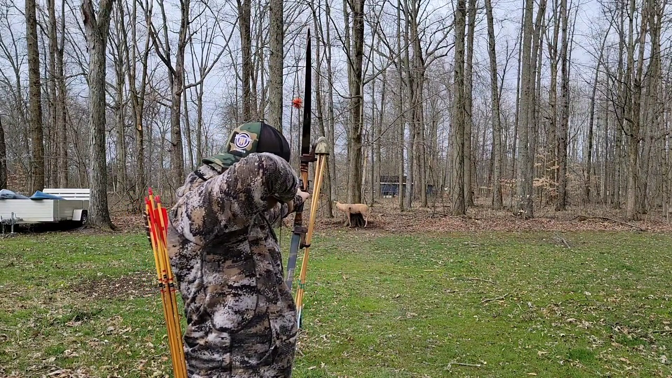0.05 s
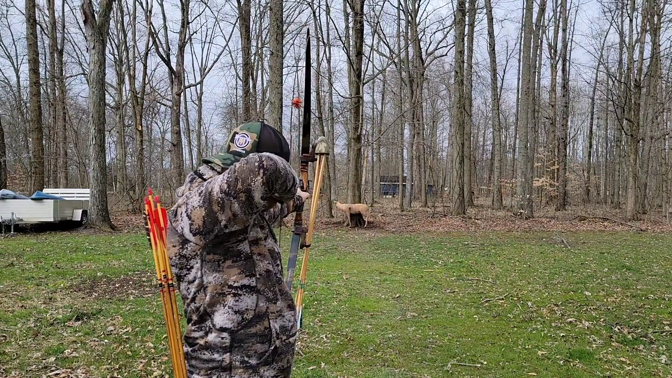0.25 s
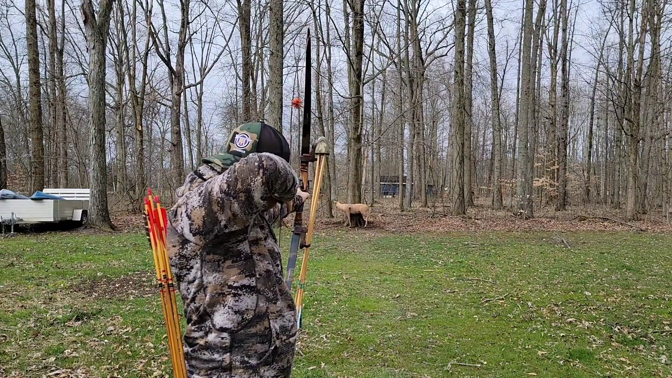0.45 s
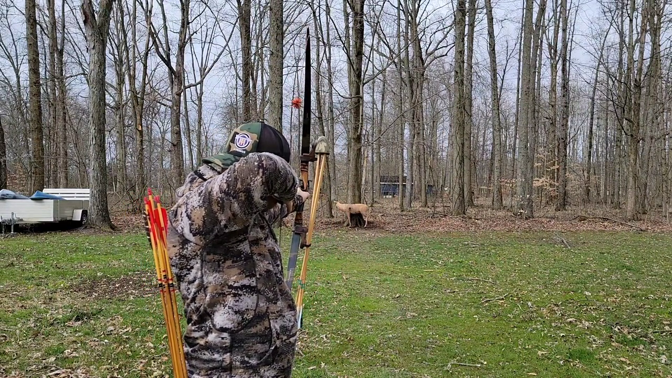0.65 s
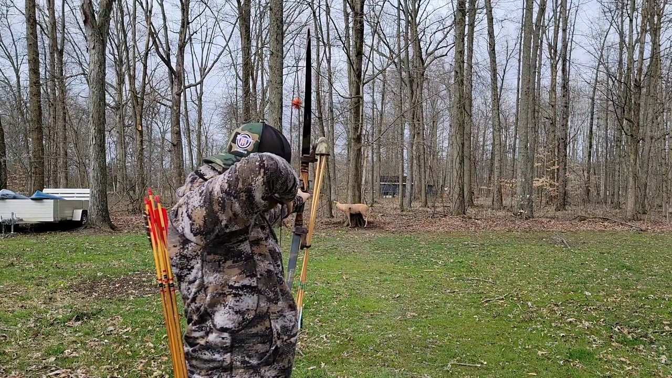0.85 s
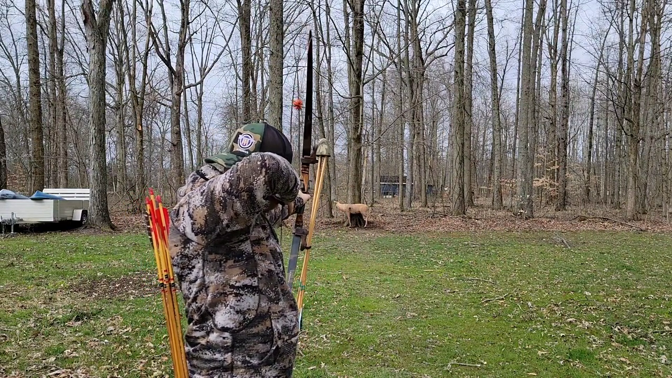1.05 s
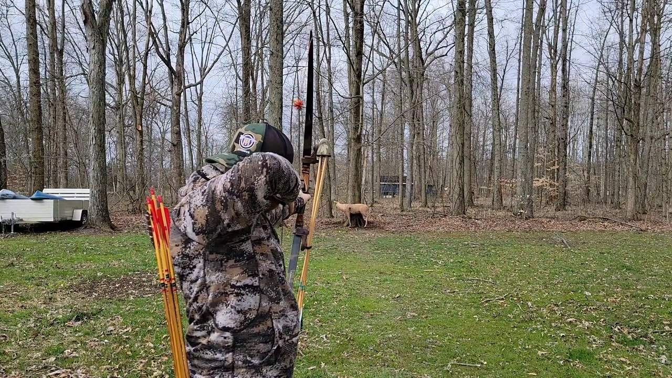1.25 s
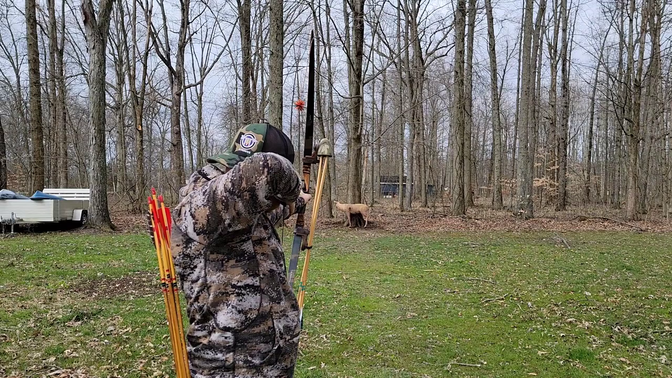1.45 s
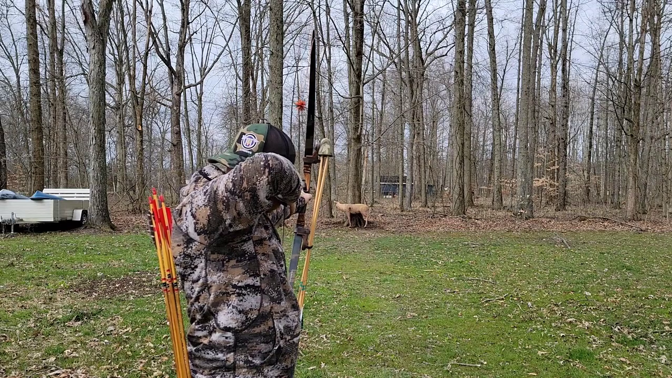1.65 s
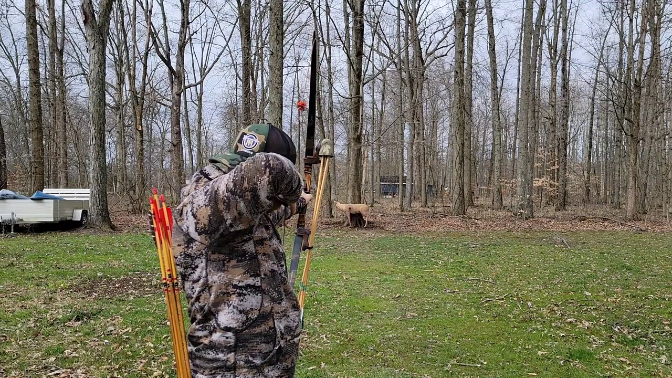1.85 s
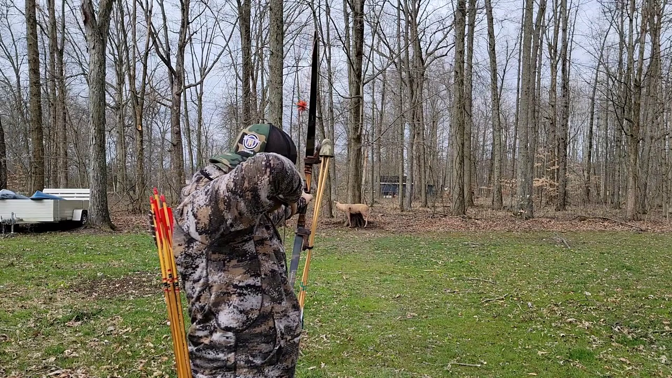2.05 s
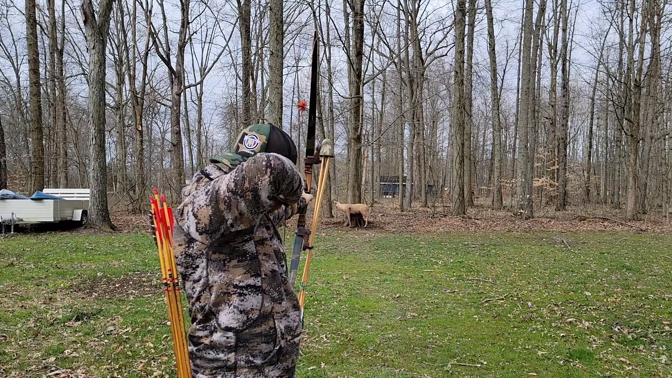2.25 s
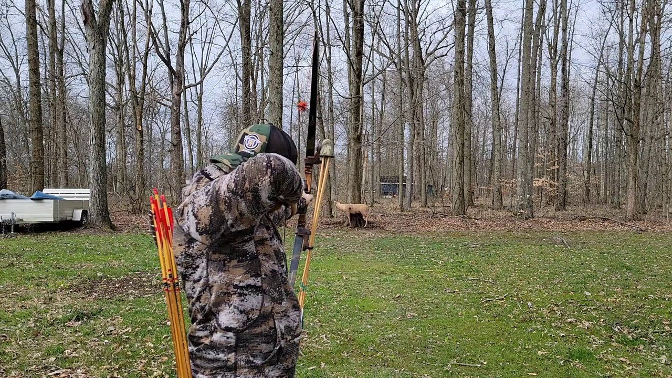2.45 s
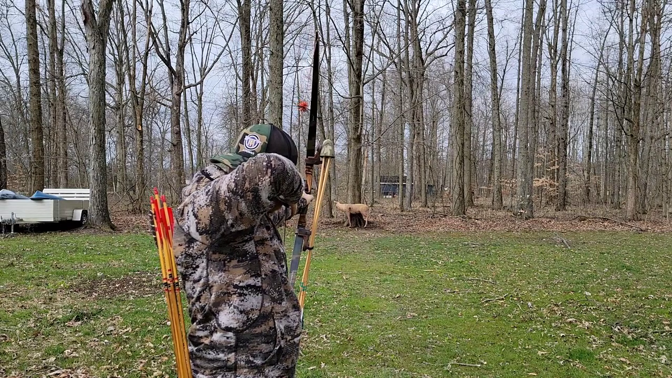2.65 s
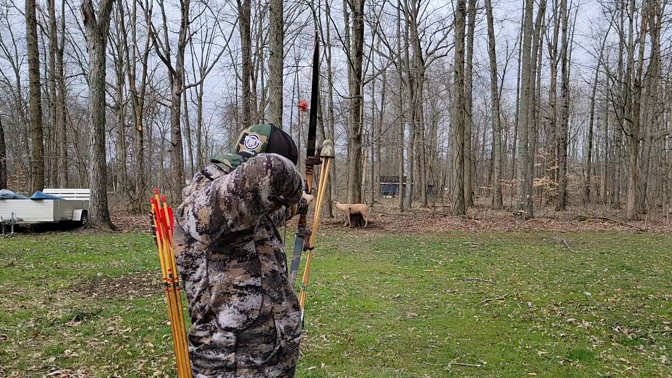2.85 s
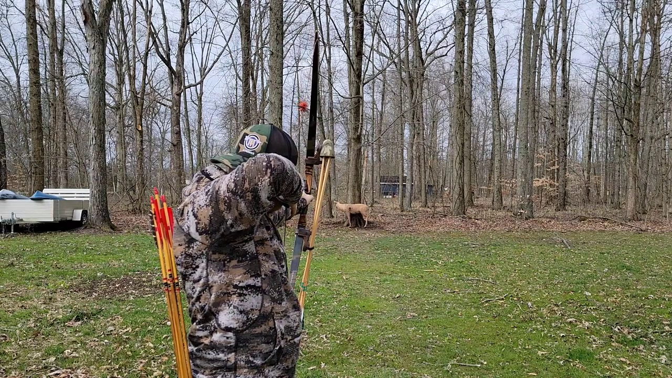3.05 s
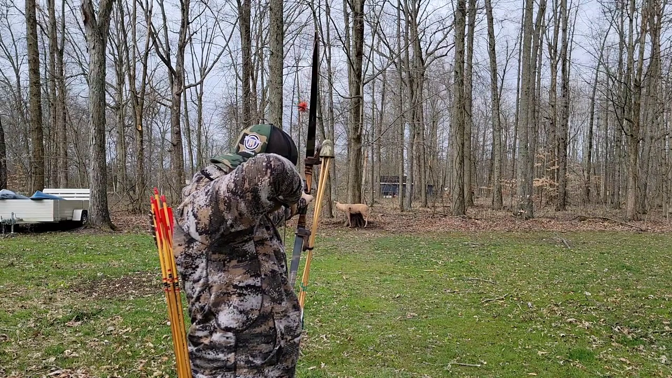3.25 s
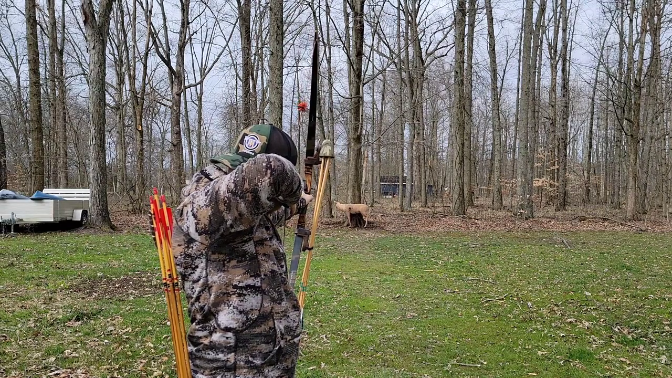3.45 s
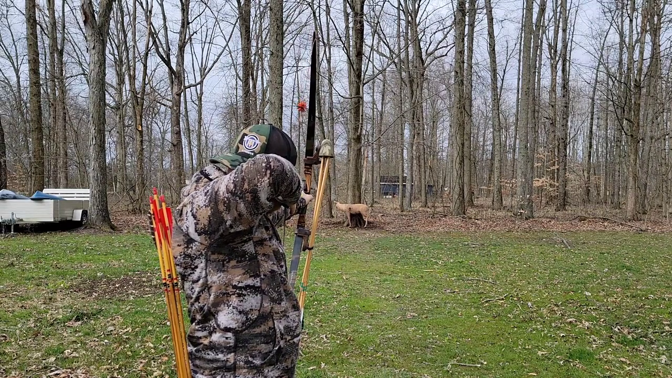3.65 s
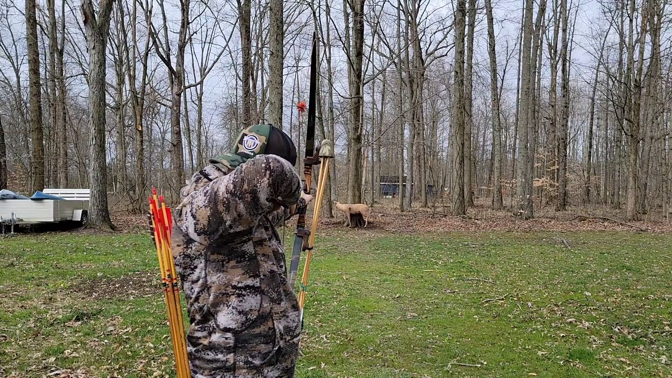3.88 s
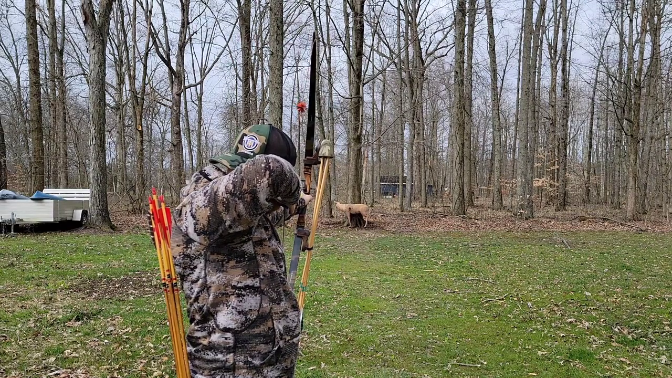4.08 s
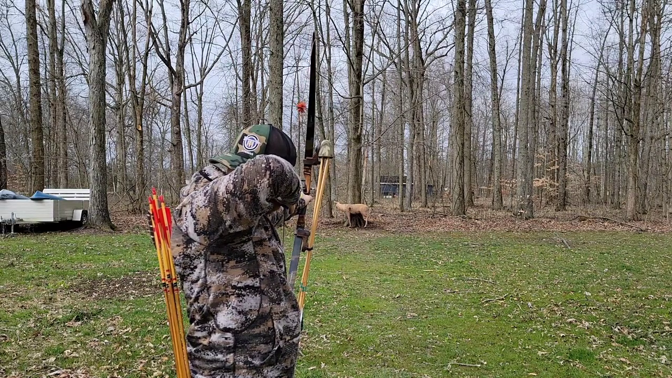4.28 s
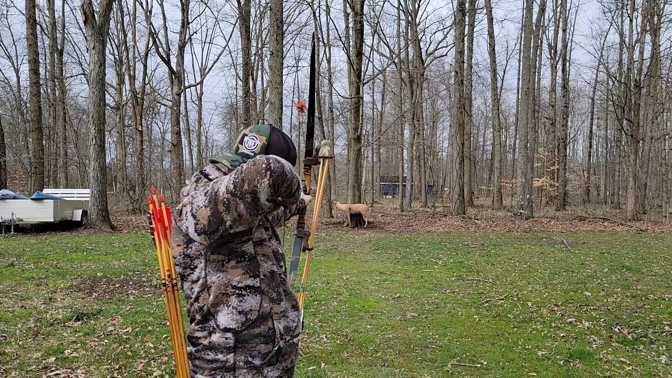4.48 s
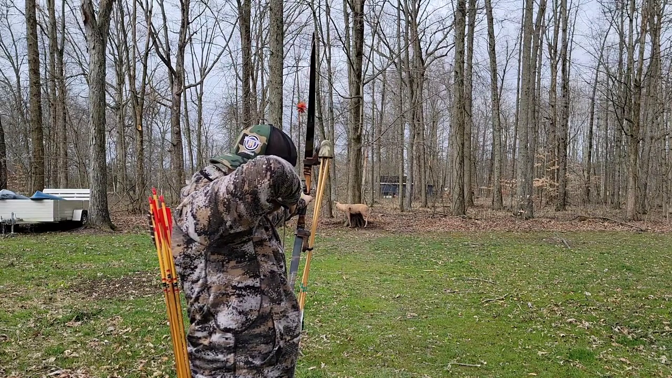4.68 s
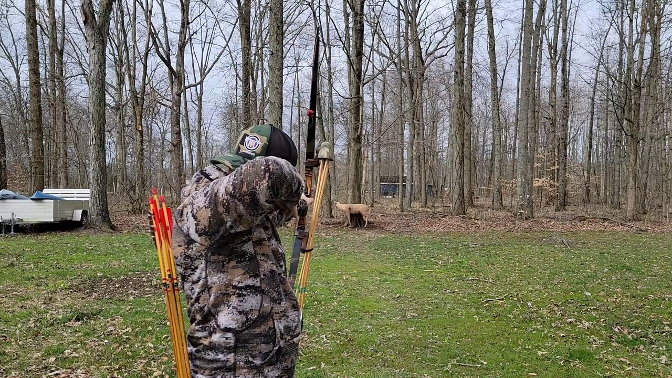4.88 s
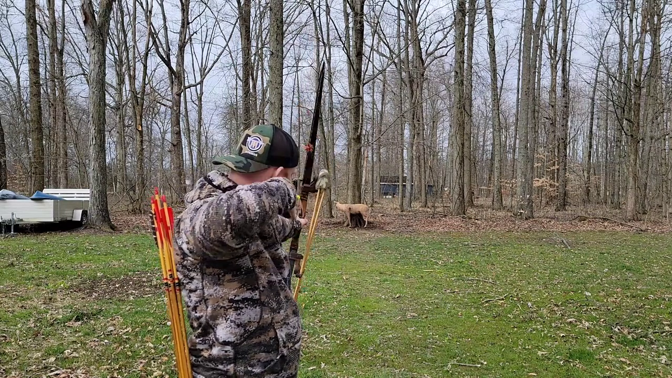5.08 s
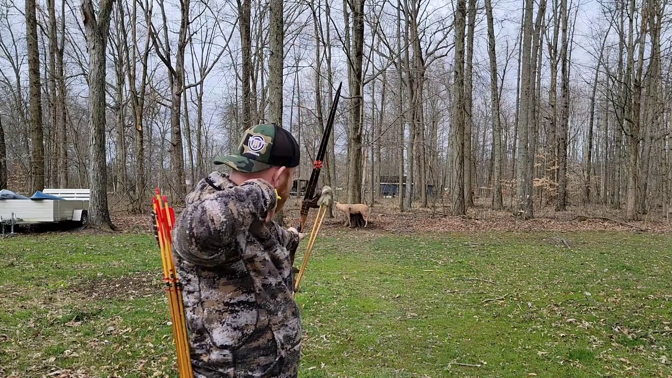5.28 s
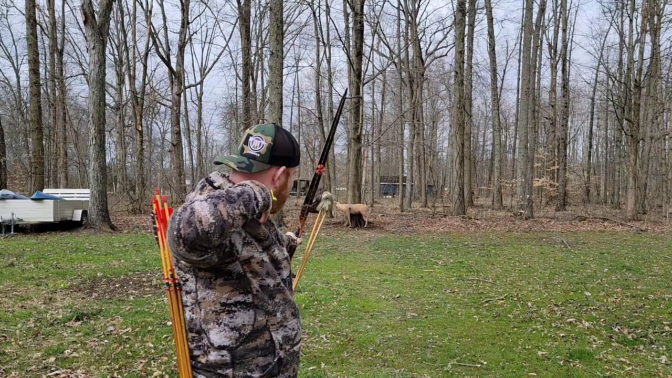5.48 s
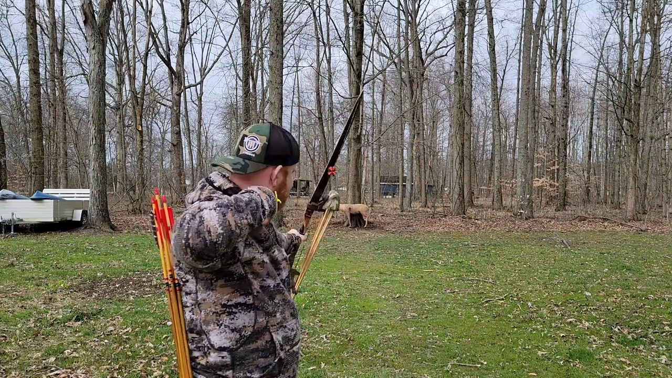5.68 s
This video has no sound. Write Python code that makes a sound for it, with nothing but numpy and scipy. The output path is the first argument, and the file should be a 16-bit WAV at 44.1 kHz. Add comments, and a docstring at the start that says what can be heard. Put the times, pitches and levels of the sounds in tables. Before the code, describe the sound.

A very quiet clearing beside woods, heard in stereo from near an archer. A far low hum swells gently, strongest near 4.7 s, under a soft hiss of open air. From the start, one bird repeats brief upward whistles every half second or so until about 2.8 s, with other whistles, two-tone pips and a dim, slowly fading chorus echoing among the trees. Dry, faint rustles stir at 1.5 and 2.8 s. From 2.9 to 4.8 s a bird rolls a quick, rippling phrase about every 0.35 s. Another upslur comes at 4.9 s and a dull handling bump at 5.1 s. At 5.25 s the bowstring scrapes loose and slaps hard, by far the loudest event, with a short woody low twang and weak tree echo. Clothing rubs at 5.4 s, a faint distant arrow knock follows at 5.53 s with a tiny high clink, then crisp gear ticks around 5.65 s.

```python
"""A longbow is shot: its string scrapes off the fingers by stick-slip friction, slaps taut and sets
the bow's damped modes twanging; the arrow knocks faintly into a far butt.
The archer's clothes and gear rub and tick in short bursts of friction noise.
Birds whistle gliding near-sine notes, and the trees scatter bow and birds back as dense, weak echoes.
Beneath lie a far low hum and the hiss of open air, both coloured noise."""
import sys
import numpy as np
from scipy import signal
from scipy.fft import rfft, irfft
from scipy.io import wavfile
from scipy.ndimage import uniform_filter1d

SR = 44100
rng = np.random.default_rng(int(sys.argv[2]) if len(sys.argv) > 2 else 0)


def int16_out(signal):
    """Quantize to a 16-bit WAV file."""
    q = np.round(np.clip(np.atleast_2d(signal).T, -1, 1) * 32767)
    wavfile.write(sys.argv[1], SR, q.astype(np.int16))


N = 252252  # samples
EDGE_HZ = 15900  # upper band limit


def gain_of(db):
    """Level to amplitude: 20 dB is a factor of ten."""
    return 10 ** (np.asarray(db) / 20)


def evened(x):
    """Normalisation to a root-mean-square value of one."""
    return x / np.sqrt(np.mean(x ** 2) + 1e-20)


def read(points, hz):
    """Interpolation: straight lines between points on a log-frequency axis."""
    f, value = np.transpose(points)
    return np.interp(np.log(hz + 1), np.log(f + 1), value)


def add(mix, s, sound):
    """Superposition: a sound is summed into the mix from s seconds on."""
    part = mix[max(round(s * SR), 0):][:len(sound)]
    part += sound[:len(part)]


def swell(t, rise, t60):
    """Build-up and decay: a smooth rise from t = 0, then an exponential fall."""
    attack = np.sin(np.pi / 2 * np.clip(t / rise, 0, 1)) ** 2
    decay = np.exp(-np.log(1000) * np.clip((t - rise) / t60, 0, 2))
    return attack * decay


def noise(colour, likeness, patchy_db):
    """Partial coherence: coloured stereo noise with drifting patches in time and frequency."""
    frames, hz = N // 256 + 5, np.fft.rfftfreq(2048, 1 / SR)
    a, b, c, d, patches = rng.standard_normal((5, frames, len(hz)))
    patches = uniform_filter1d(patches, size=16, axis=0)
    patches = evened(uniform_filter1d(patches, size=12, axis=1))
    same = np.clip(read(likeness, hz), -1, 1)
    left, independent = a + 1j * b, c + 1j * d
    right = same * left + np.sqrt(1 - same ** 2) * independent
    z = np.array([left, right]) * gain_of(read(colour, hz) + patchy_db * patches)
    _, sound = signal.istft(z.swapaxes(1, 2), nperseg=2048, noverlap=1792)
    return evened(sound[:, :N])


def scrapes(rows, colour, grain_db, spread, pan_db):
    """Stick-slip friction: bursts of tiny grains, the two microphones differing more in the treble."""
    t = np.arange(N) / SR
    power = sum((gain_of(db) * swell(t - s, rise, t60)) ** 2 for s, db, rise, t60 in rows)
    force = np.sqrt(power)
    grip = np.tanh(evened(uniform_filter1d(rng.standard_normal(N), size=24)))
    grains = evened(gain_of(grain_db * grip))
    hz = np.fft.rfftfreq(N, 1 / SR)
    spectrum = evened(gain_of(read(colour, hz)) * (hz < EDGE_HZ))
    mid, side = rfft(rng.standard_normal((2, N)) * grains * force) * spectrum
    width = spread * hz / (hz + 3000)
    lean = gain_of(pan_db * hz / (hz + 8000))  # positive pan favours the left
    return irfft(np.array([(mid + width * side) * lean, (mid - width * side) / lean]), N)


RING_LEAD = .36  # radians by which the left microphone leads


def ring(s, modes):
    """Modal vibration: damped sines that build up over a push of a few milliseconds, in stereo."""
    t, lead = np.arange(SR) / SR, np.array([[RING_LEAD / 2], [-RING_LEAD / 2]])
    sound = np.zeros((2, SR))
    for hz, db, t60, delay, rise in modes:
        envelope = np.sqrt(2) * gain_of(db) * swell(t - delay, rise, t60)
        sound += envelope * np.sin(2 * np.pi * hz * (t - delay) + lead)
    return np.pad(sound, ((0, 0), (round(s * SR), N)))[:, :N]


# Decay time of the wood's echoes. Each row: frequency in Hz, time to fall by 60 dB in seconds.
WOOD_DECAY = [(150, 0.34), (500, 1.02), (2000, 1.01), (4500, 1.45), (8000, 1.04), (15000, 0.73)]


def woods(x, treble_db):
    """Diffuse scattering: countless weak echoes from the trunks, each band dying at its own speed."""
    build_up = np.minimum(np.arange(SR) / SR / 0.022, 1)
    taps = rng.standard_normal((2, SR)) * (rng.random((2, SR)) < .06) * build_up
    hz, t, z = signal.stft(taps, SR, nperseg=256)
    decay = np.exp(-np.log(1000) * t / read(WOOD_DECAY, hz)[:, None])
    tilt = gain_of(treble_db * hz / (hz + 3000))[:, None]
    tail = signal.istft(z * decay * tilt, SR, nperseg=256)[1]
    return signal.fftconvolve(x[None], tail / np.linalg.norm(tail[0]), axes=1)[:, :N]


def whistles(notes, waver, taper=0.62):
    """Frequency modulation: near-sine notes, each gliding through three pitches with a slight waver."""
    out = np.zeros(N)
    for s, length, start_hz, middle_hz, end_hz, db in notes:
        u = np.linspace(0, 1, round(length * SR))
        hz = np.polyval(np.polyfit([0, .5, 1], [start_hz, middle_hz, end_hz], 2), u)
        wander = evened(uniform_filter1d(rng.standard_normal(SR // 2), size=120))
        hz *= 1 + waver * wander[:len(u)]
        envelope = np.sqrt(2) * gain_of(db) * signal.windows.tukey(len(u), taper)
        add(out, s, envelope * np.sin(2 * np.pi * np.cumsum(hz) / SR))
    return out


# Wavering tones in the far hum. Each row: frequency in Hz, level before the hum's swell in dB.
DRONE_TONES = [(68, -64), (109, -69.5), (132, -74), (162, -71.5)]


def drone(width_hz):
    """Narrow-band noise: tones that fade in and out on their long way through the air."""
    hz = np.fft.rfftfreq(N, 1 / SR)
    shape = sum(gain_of(db) * evened(np.exp(-((hz - centre) / width_hz) ** 2))
                for centre, db in DRONE_TONES)
    return irfft(rfft(rng.standard_normal(N)) * shape, N)


# Spectra of the far hum and of the open air. Each row: frequency in Hz, relative density in dB per Hz.
HUM_COLOUR = [(10, -34), (21, -30.5), (33, -15.5), (50, -2.5), (72, 3), (95, 0), (125, -5), (155, -6.5),
              (175, -11.5), (212, -15), (250, -24), (310, -34), (400, -53), (800, -110)]
AIR_COLOUR = [(200, 2), (330, -3.5), (480, -2), (800, 6), (1100, 2), (1600, -1.5), (2800, 3), (3400, -3),
              (4000, -15), (6000, -18.5), (7100, -13.5), (8200, -30), (11000, -27.5), (12500, -25),
              (15800, -25.5)]
# Likeness of the two microphones. Each row: frequency in Hz, left-right correlation from -1 to 1.
STEREO_LIKENESS = [(50, .95), (200, 0.81), (400, -0.35), (800, -0.52), (1500, -0.4), (3000, -0.31),
                   (6000, -0.26), (15000, 0.051)]
# Swelling and sinking of the hum. Each row: time in seconds, relative level in dB.
HUM_DRIFT = [(0, -56.5), (.4, -58.5), (2.3, -58), (3.0, -57), (4.3, -56), (4.7, -53.5), (5.2, -57),
             (5.7, -58)]
HUM_DB, AIR_DB = -58, -69  # mean levels


def outdoors():
    """Ambient noise: a far low hum that swells and sinks, and the soft steady hiss of open air."""
    s, db = np.transpose(HUM_DRIFT)
    drift = evened(gain_of(np.interp(np.arange(N) / SR, s, db)))
    hum = gain_of(HUM_DB) * noise(HUM_COLOUR, STEREO_LIKENESS, patchy_db=0.95) + drone(width_hz=3.9)
    air = gain_of(AIR_DB) * noise(AIR_COLOUR, STEREO_LIKENESS, patchy_db=1.4)
    return drift * hum + air


# source level of the weakest slurs at the start (dB), and how fast the chorus dies down
CHORUS_DB, CHORUS_FADE_DB_PER_S = -75.5, 1.4


def chorus(count):
    """Reverberant field: short slurs of many birds deep in the wood, mostly echo, slowly dying down."""
    when, pitch, length, slur, loud = rng.random((count, 5)).T
    s = (np.arange(count) + when) / count * N / SR
    hz, bend = 1730 * 2 ** (pitch ** 1.4), .2 * (slur - .5)
    db = CHORUS_DB + 6 * loud - CHORUS_FADE_DB_PER_S * s
    notes = np.transpose([s, .025 + .04 * length, hz * (1 - bend), hz, hz * (1 + bend), db])
    far = whistles(notes, waver=.012)
    return gain_of(-3.5) * far + woods(far, treble_db=1.5)


# A slow low half joined to a steep upper half. Each row: start as a share of the whistle's length,
# length as a share of it, start, middle and end pitch in Hz, level relative to the whistle in dB.
SLUR_HALVES = [(0, .58, 2533, 2637, 2755, -1), (.55, .42, 2852, 3067, 3380, 1.5)]


def upslurs(rows):
    """Frequency glide: two joined halves make each whistle sweep up ever faster."""
    notes = [(s + at * length, share * length, *hz, db + half_db)
             for s, length, db in rows for at, share, *hz, half_db in SLUR_HALVES]
    return whistles(notes, waver=.01, taper=0.54)


# One bird repeats its upslur. Each row: start in seconds, length in seconds, source level in dB,
# gain of the direct sound let through by the trees in dB.
UPSLUR_CALLS = [(0.057, 0.097, -66.5, -0.5), (0.406, 0.098, -62.5, 0.5), (.665, 0.078, -68.5, -4.5),
                (1.086, 0.074, -65.5, -3.5), (1.505, 0.088, -65.5, -6), (1.914, .08, -71, -3),
                (2.395, .09, -64, -2.5), (2.733, .094, -62, -1), (4.872, .092, -61.5, 1)]


def upslur_bird():
    """Direct and scattered sound: the trees screen the direct whistle, and the wood rings with it."""
    source = upslurs([row[:3] for row in UPSLUR_CALLS])
    direct = upslurs([(s, length, db + through_db) for s, length, db, through_db in UPSLUR_CALLS])
    return direct * gain_of([[-1.2], [-1.6]]) + gain_of(-2.5) * woods(source, treble_db=8)


# Plain whistles and chips from other birds. Each row: start in seconds, length in seconds,
# start and end pitch in Hz, source level in dB.
PLAIN_WHISTLES = [(0.062, .17, 1740, 2110, -78), (.19, 0.17, 2125, 2545, -70.5),
                  (0.349, 0.043, 4820, 4800, -82), (.5, .12, 2860, 2824, -72.5),
                  (.55, .14, 2117, 2220, -71.5), (1.33, .09, 2782, 2800, -70.5),
                  (1.799, 0.041, 2080, 1840, -72.5), (2.202, 0.072, 2080, 1730, -73),
                  (2.318, 0.052, 5690, 5550, -76), (2.557, 0.06, 2620, 2566, -68),
                  (2.592, .048, 2315, 2270, -70), (4.399, .23, 6620, 7900, -82.5),
                  (4.608, .02, 5880, 5700, -84), (4.71, .02, 6000, 5840, -81), (4.81, .2, 6280, 5970, -83),
                  (5.22, 0.066, 2585, 2700, -65), (5.371, 0.081, 2307, 2287, -68),
                  (5.499, 0.091, 1770, 1723, -73)]


def plain_notes():
    """Linear glide: each pitch runs straight from start to end."""
    return [(s, length, start_hz, (start_hz + end_hz) / 2, end_hz, db)
            for s, length, start_hz, end_hz, db in PLAIN_WHISTLES]


# Two-tone pips, each with a falling note. Each row: start in seconds, then source levels in dB
# of the high tone, the low tone and the falling note.
PIPS = [(.35, -97, -83, -86), (.77, -85, -82, -77.5), (1.185, -86, -78, -74.5), (1.602, -96, -77.5, -75.5)]
# The pip's high and low tone in Hz.
PIP_TONES = (5500, 3620)
# The falling note's start, middle and end pitch in Hz.
FALL_PITCH = (4900, 4490, 4150)
PIP_S, FALL_S, FALL_AFTER_S = .036, 0.05, .087  # lengths; delay of the fall from the pip's start


def pip_notes():
    """Superposed tones: a steady two-tone pip, then a falling note."""
    notes = []
    for s, *pip_db, fall_db in PIPS:
        notes += [(s, PIP_S, hz, hz, hz, db) for hz, db in zip(PIP_TONES, pip_db)]
        notes.append((s + FALL_AFTER_S, FALL_S, *FALL_PITCH, fall_db))
    return notes


def other_birds():
    """Direct and scattered sound: plain whistles and pips ring among the trees."""
    others = whistles(plain_notes() + pip_notes(), waver=.012)
    return others * gain_of([[-1], [-1.5]]) + gain_of(-2.0) * woods(others, treble_db=9)


# Ticks of quiver and gear. Each row: start in seconds, level in dB, rise in seconds, 60 dB decay in seconds.
TICKS = [(1.14, -76.5, .016, 0.076), (1.966, -79.5, 0.00092, .03), (2.805, -83, .001, .04),
         (3.712, -82, .001, .02), (5.3635, -60, 0.00092, 0.018), (5.582, -68, .001, .02),
         (5.604, -68.5, .001, 0.02), (5.6485, -54, 0.00082, 0.014), (5.655, -55, .0015, 0.04),
         (5.706, -69.5, 0.0011, 0.039)]
# Each row: frequency in Hz, relative density in dB per Hz.
TICK_COLOUR = [(500, -29), (2800, -18), (4000, -7), (4900, 0.5), (6200, -5), (7700, 1.5), (9300, -13.5),
               (11000, -19), (13000, -14), (15800, -18)]


def gear_ticks():
    """Impulsive noise: quiver and gear tick in very short bright bursts."""
    return scrapes(TICKS, TICK_COLOUR, grain_db=0, spread=0.99, pan_db=4.5)


# Faint dry rustling. Each row: start in seconds, level in dB, rise in seconds, 60 dB decay in seconds.
STIRS = [(1.5, -73.5, 0.046, 1), (2.8, -74.5, 0.053, 0.9)]
# Each row: frequency in Hz, relative density in dB per Hz.
STIR_COLOUR = [(300, -28), (700, -9), (1000, 3), (1500, -5), (3000, -9), (6000, -30), (15000, -44)]


def leaves():
    """Friction noise: soft, dry, grainy rustles, perhaps leaves on the ground."""
    return scrapes(STIRS, STIR_COLOUR, grain_db=5, spread=1.5, pan_db=2)


# One phrase of the rolling song. Each row: start within the phrase in seconds, length in seconds,
# start, middle and end pitch in Hz, source level before the repeat's own in dB.
SONG_PHRASE = [(0.015, .016, 3940, 4040, 4210, -70.5), (0.038, 0.031, 3415, 3333, 3316, -60.5),
               (.064, .012, 3950, 3986, 3950, -70), (.068, .022, 3090, 3042, 3010, -58.5),
               (.085, 0.046, 3350, 3532, 3640, -65.5), (0.115, .014, 3280, 2760, 2440, -67),
               (0.124, 0.032, 2400, 2391, 2470, -61.5), (.14, .04, 3480, 3620, 3660, -65.5),
               (0.187, 0.03104, 2607, 2890, 3060, -54.5), (.236, 0.047, 1910, 1875, 1910, -68.5),
               (.278, .048, 1908, 2162, 2530, -66)]
# Repeats of the phrase. Each row: start in seconds, relative level in dB.
SONG_REPEATS = [(2.787, -6), (3.14, -0.5), (3.494, 1), (3.844, 0.5), (4.196, 0), (4.573, -3.5)]
SONG_START_S, SONG_END_S = 2.9, 4.8  # the song starts and stops in mid phrase


def rolling_song():
    """Echo and reverberation: a bird rolls a repeated phrase; the edge of the wood throws it back."""
    notes = [(s + at, *shape, db + effort_db)
             for s, effort_db in SONG_REPEATS for at, *shape, db in SONG_PHRASE
             if SONG_START_S < s + at < SONG_END_S]
    song, echo = whistles(notes, waver=0.0066), np.zeros(N)
    add(echo, .094, gain_of(-16.0) * song)
    return song * gain_of([[-.5], [-2.5]]) + echo + gain_of(0.5) * woods(song, treble_db=4.0)


# Rubbing sleeves and jacket. Each row: start in seconds, level in dB, rise in seconds, 60 dB decay in seconds.
RUBS = [(4.88, -77.5, .004, 0.11), (5.388, -57.5, 0.017, 0.1), (5.484, -65.5, 0.0093, 0.051)]
# Each row: frequency in Hz, relative density in dB per Hz.
RUB_COLOUR = [(500, -16), (2800, -10), (4500, 1), (6200, 1), (7400, -3), (9000, -21), (11000, -18),
              (13000, -11), (15800, -7)]


def clothes():
    """Friction noise: sleeves and jacket rub in grainy bursts."""
    return scrapes(RUBS, RUB_COLOUR, grain_db=5, spread=0.86, pan_db=3.0)


# The bow settles in the hand before the release. Each row: start in seconds, level in dB,
# rise in seconds, 60 dB decay in seconds.
BUMPS = [(5.107, -60.5, 0.0028, 0.037)]
# Each row: frequency in Hz, relative density in dB per Hz.
BUMP_COLOUR = [(150, -13), (380, 8), (900, -1), (2000, -25), (6000, -26), (15000, -30)]


def grip():
    """Contact noise: a dull bump as the bow settles in the hand."""
    return scrapes(BUMPS, BUMP_COLOUR, grain_db=0, spread=.8, pan_db=3)


# The string leaves the fingers. Each row: start in seconds, level in dB, rise in seconds, 60 dB decay in seconds.
SLIPS = [(5.2455, -28, 0.0041, 0.073)]
# Each row: frequency in Hz, relative density in dB per Hz.
SLIP_SPECTRUM = [(60, -26), (200, -3), (400, -4), (750, 2), (1100, -10), (1500, -5.5), (2000, -3),
                 (2900, -1), (3700, -6.5), (5400, -11), (7000, -20.5), (10500, -28), (13500, -19),
                 (15800, -13)]


def string_slip():
    """Stick-slip friction: the string scrapes off the fingers."""
    return scrapes(SLIPS, SLIP_SPECTRUM, grain_db=5, spread=0.99, pan_db=0.5)


# Modes of the arrow shaft. Each row: frequency in Hz, level in dB, 60 dB decay in seconds,
# delay after the release in seconds, rise in seconds.
SHAFT = [(518, -38, .06, 0.0023, 0.0067), (765, -41, 0.064, 0.00193, 0.0027),
         (1090, -35, 0.064, 0.00093, 0.0039)]


def shaft_ring():
    """Modal vibration: the release sets the arrow shaft ringing."""
    release_s = SLIPS[0][0]
    return ring(release_s, SHAFT)


# Modes of string and limbs. Each row: frequency in Hz, level in dB, 60 dB decay in seconds,
# delay after the string comes taut in seconds, rise in seconds.
BOW = [(85, -34.5, 0.13, 0.0018, .012), (181.6, -32.5, 0.31, .008, 0.0083),
       (200, -25, 0.045, 0.00597, 0.0071), (263.6, -44.5, 0.28, 0.0039, 0.0091),
       (365.7, -22.5, 0.12, 0.00802, .014), (382, -38, 0.078, 0.0026, 0.01),
       (536.2, -26, 0.11, 0.00094, 0.0058), (585, -35.5, 0.078, 0.0009, 0.0031),
       (717, -39.5, 0.069, .012, 0.0059), (861, -45, 0.076, .014, .005), (1105, -58, 0.092, 0.0021, .004),
       (1315, -46, 0.09, .012, 0.0035), (2380, -50, .07, .012, .004)]
TAUT_S = 5.256  # the string comes taut


def bow_twang():
    """Modal vibration: string and limbs twang once the string is taut."""
    return ring(TAUT_S, BOW)


# Slaps of the string. Each row: start in seconds, level in dB, rise in seconds, 60 dB decay in seconds.
SLAPS = [(5.2638, -28, 0.0013, 0.071), (5.2695, -32, 0.00096, 0.057), (5.2752, -31, .001, 0.12)]
# Each row: frequency in Hz, relative density in dB per Hz.
SLAP_SPECTRUM = [(200, 4), (700, 7), (1100, -5), (1700, -4), (2500, -2), (4500, -7), (6500, -8.5),
                 (8500, -20.5), (11000, -19.5), (13000, -8.5), (15800, -15)]


def string_slap():
    """Impulsive noise: the string slaps taut in sharp bursts."""
    return scrapes(SLAPS, SLAP_SPECTRUM, grain_db=1.5, spread=1.2, pan_db=-2.0)


# The arrow lands. Each row: start in seconds, level in dB, rise in seconds, 60 dB decay in seconds.
KNOCKS = [(5.5305, -59.5, 0.002, 0.068)]
# Each row: frequency in Hz, relative density in dB per Hz.
KNOCK_SPECTRUM = [(150, -19), (400, -5), (700, -1), (1200, -4), (2200, -27), (5000, -26), (15000, -43)]


def arrow_knock():
    """Impact noise: the arrow knocks faintly into the far butt."""
    return scrapes(KNOCKS, KNOCK_SPECTRUM, grain_db=0, spread=0.86, pan_db=5)


def shot():
    """Direct and scattered sound: bow and arrow, and their echo off the trees."""
    direct = string_slip() + shaft_ring() + bow_twang() + string_slap() + arrow_knock()
    return direct + gain_of(-16.5) * woods(direct.mean(0), treble_db=15)


# Something small clinks. Each row: frequency in Hz, level in dB, 60 dB decay in seconds,
# delay in seconds, rise in seconds.
CLINK = [(12800, -67.5, 0.043, 0.0027, 0.0066)]


def clink():
    """Modal vibration: something small rings on one high mode."""
    return ring(5.538, CLINK)


def scene():
    """Superposition: air, birds, archer and shot add up."""
    birds = chorus(count=90) + upslur_bird() + other_birds() + rolling_song()
    archer = gear_ticks() + clothes() + grip() + clink()
    return outdoors() + birds + leaves() + archer + shot()


def record(dry):
    """Low-pass filtering: the recorder's band limit."""
    low_pass = signal.firwin(511, EDGE_HZ, window=("kaiser", 9), fs=SR)
    return signal.oaconvolve(dry, low_pass[None], "same")


dry = scene()
out = record(dry)
int16_out(out)
```